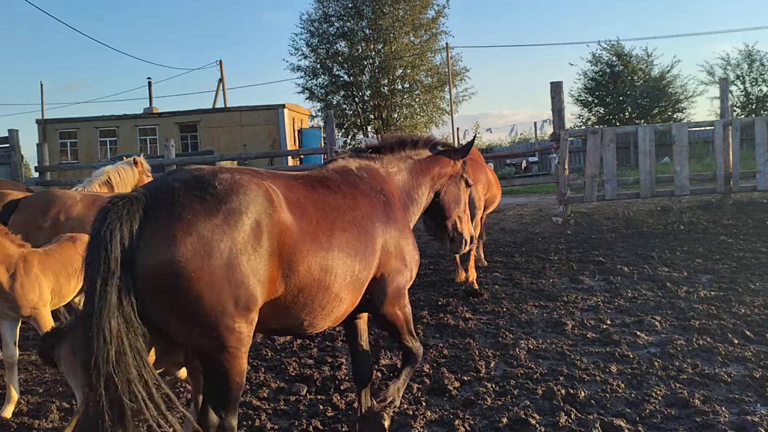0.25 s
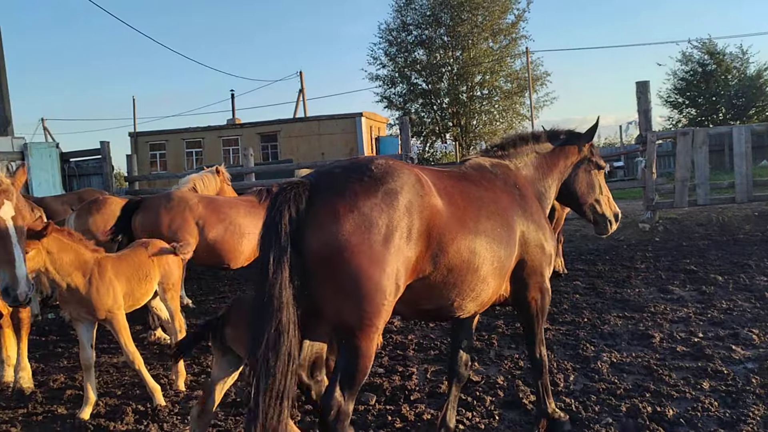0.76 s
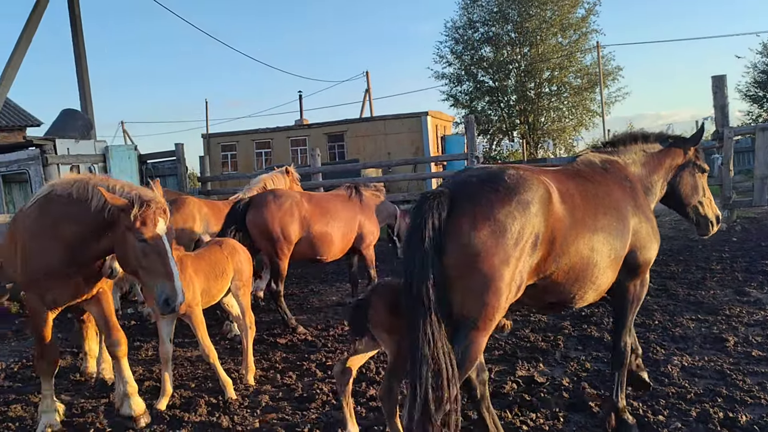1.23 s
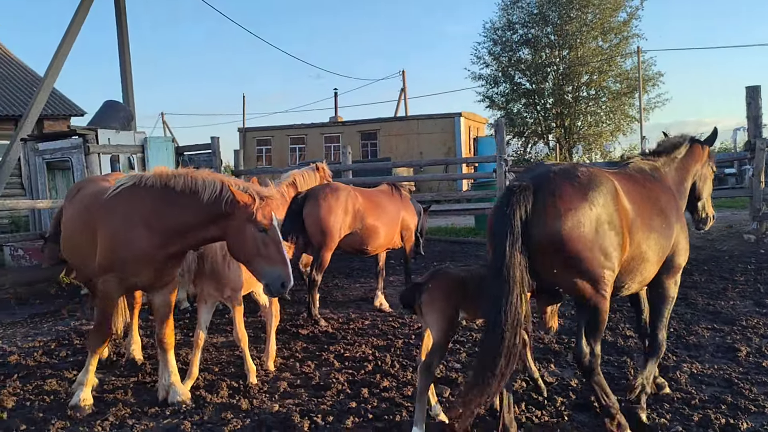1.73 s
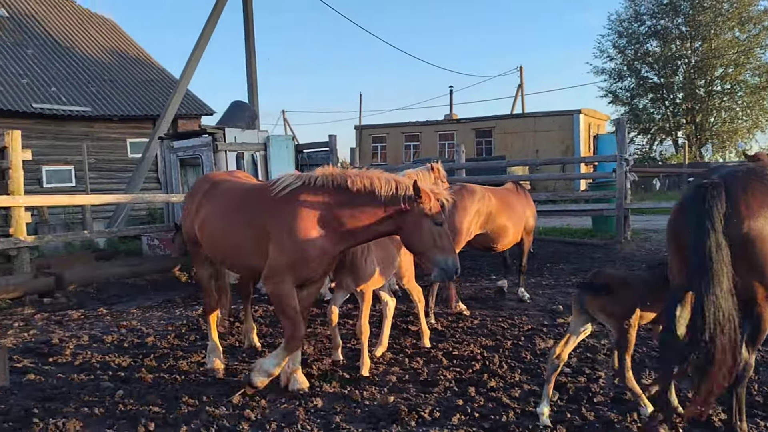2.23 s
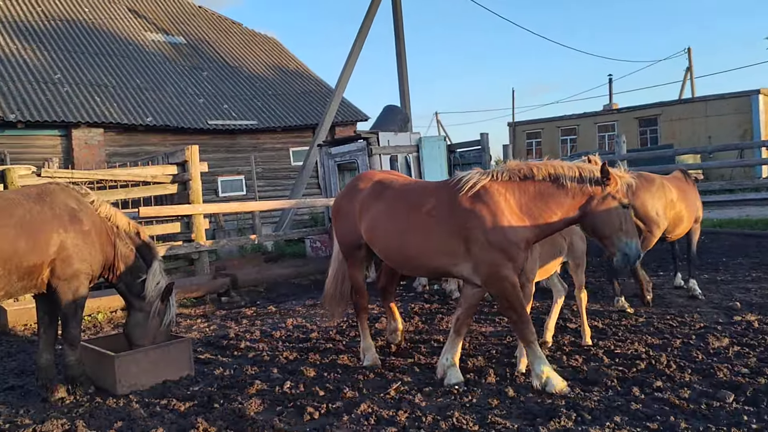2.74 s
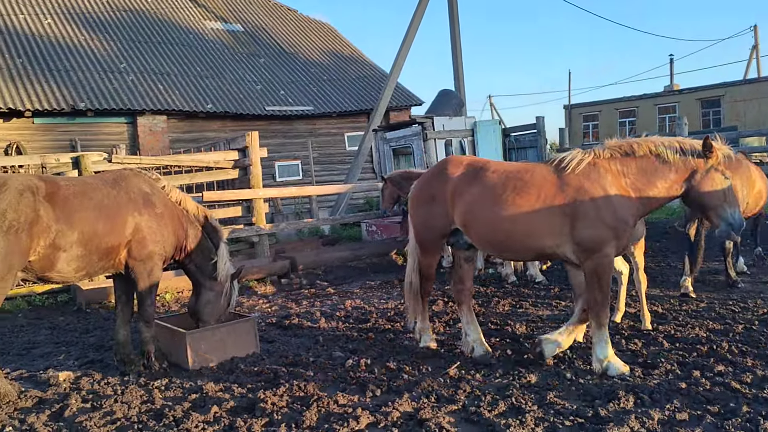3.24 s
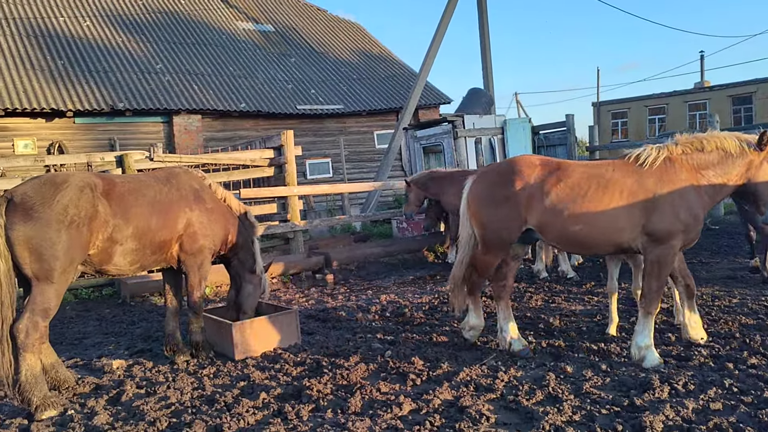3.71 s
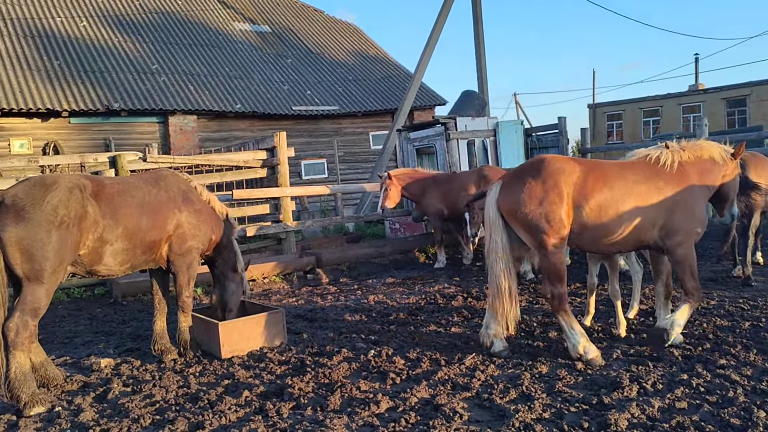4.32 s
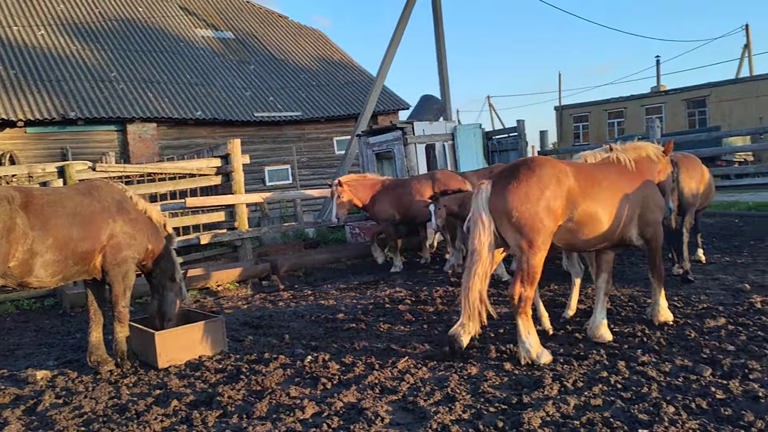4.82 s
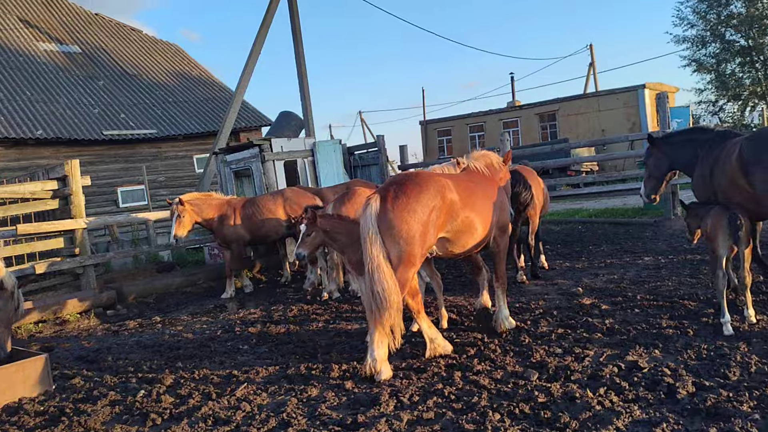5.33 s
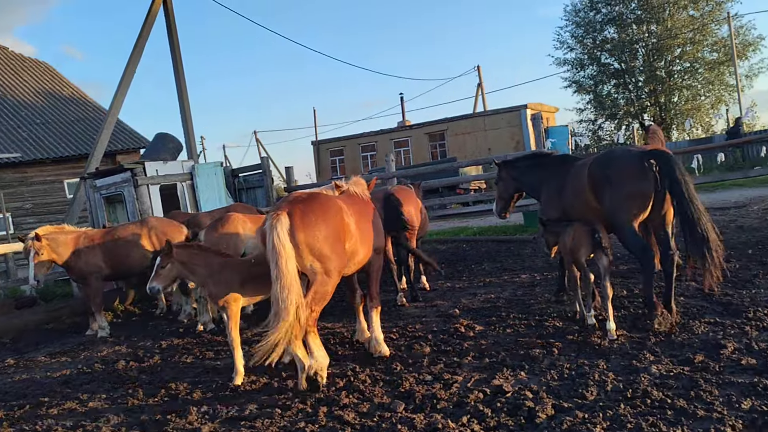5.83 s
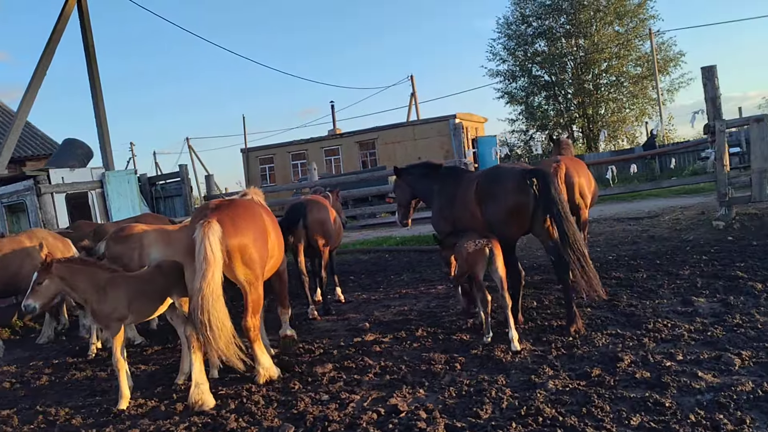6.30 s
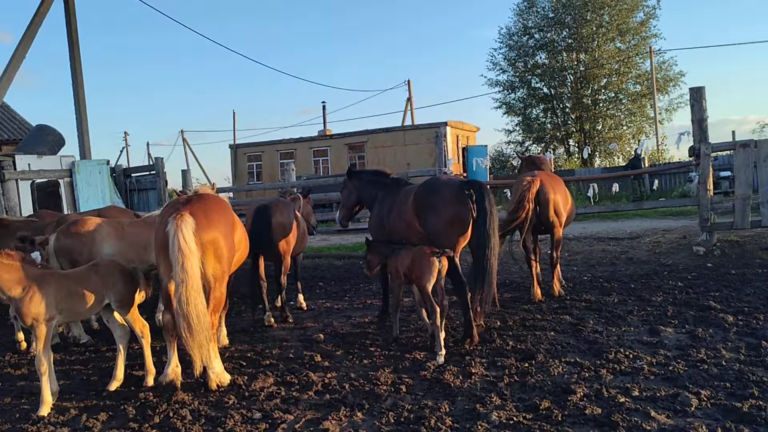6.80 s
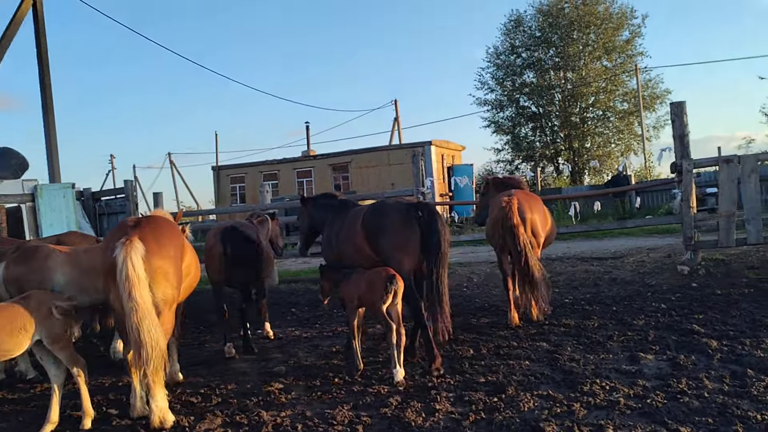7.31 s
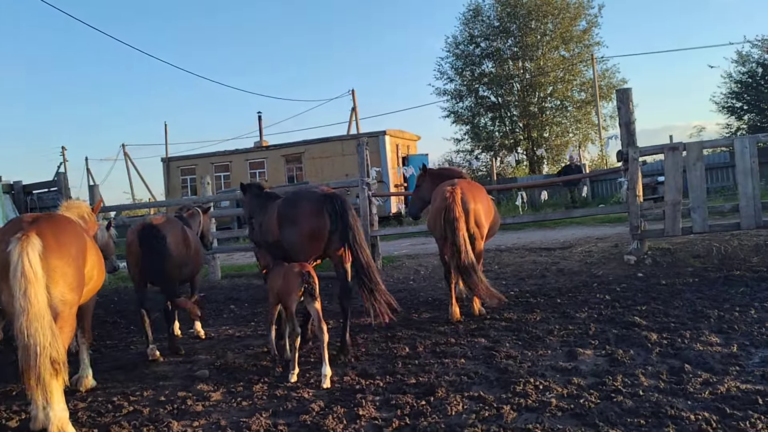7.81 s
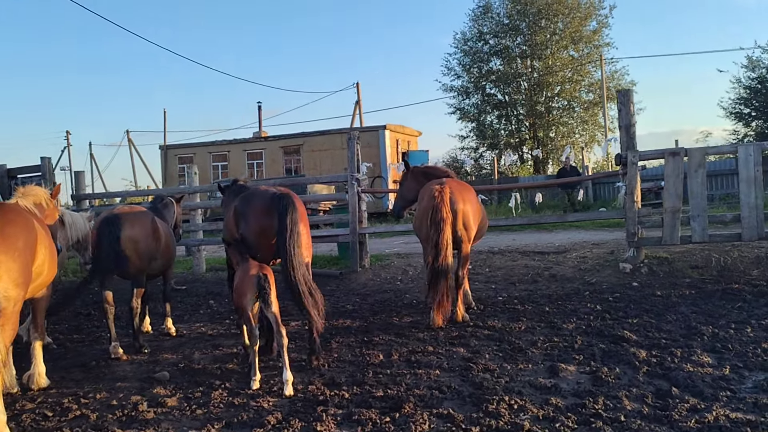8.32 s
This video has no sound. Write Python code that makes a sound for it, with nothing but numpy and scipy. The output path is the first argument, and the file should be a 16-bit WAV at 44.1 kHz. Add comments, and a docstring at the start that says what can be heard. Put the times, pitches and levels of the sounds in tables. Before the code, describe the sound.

Close, sticky mud crackles, slurps and snaps almost continuously as horses tread a paddock, with soft thuds, a faint breathy hiss and light wind.

```python
"""Horses walk through wet mud in an open paddock, close to a hand-held phone with one microphone.
From the start, yard noise and a wavering hum lie far off (shaped noise), with wind puffs on the microphone;
close by, mud sucks, fizzes and sprays (patchy noise and tiny bursting pockets), smacks as it lets go (snaps
and splatter), then gurgles (ringing noise) and chirps (gliding tones). From 1.8 s a breathy hiss (resonant
noise) comes and goes, from 2.4 s hooves thud (damped sines). A gate ducks the quiet moments."""
import sys
import numpy as np
from scipy import signal
from scipy.fft import rfft, irfft
from scipy.io import wavfile
from scipy.ndimage import uniform_filter1d, minimum_filter1d

SR = 44100
rng = np.random.default_rng(int(sys.argv[2]) if len(sys.argv) > 2 else 0)


def store_wav(level_fs):
    """Save 16-bit WAV to argv[1]."""
    pcm = np.round(np.clip(np.atleast_2d(level_fs), -1, 1) * 32767)
    wavfile.write(sys.argv[1], SR, pcm.T.astype(np.int16))


N = 377055  # length [samples]


def gain_of(db):
    """Decibels to amplitude."""
    return 10 ** (np.asarray(db) / 20)


def evened(x):
    """Scales to rms 1."""
    return x / np.sqrt(np.mean(x ** 2) + 1e-20)


def read(points, at):
    """Reads a spectrum in dB on a log-frequency axis."""
    hz, db = np.transpose(points)
    return np.interp(np.log(at + 1), np.log(hz + 1), db)


def add(mix, s, sound):
    """Mixes a sound in at time s."""
    part = mix[max(round(s * SR), 0):][:len(sound)]
    part += sound[:len(part)]


def coloured(x, spectrum):
    """Filters x by a spectrum and scales it to rms 1."""
    hz = np.fft.rfftfreq(len(x), 1 / SR)
    return evened(irfft(rfft(x) * gain_of(read(spectrum, hz)), len(x)))


def resonate(x, hz, width):
    """A resonance applied twice, for steep skirts: x is shifted down to 0 Hz, smoothed and shifted back."""
    turn = np.exp(2j * np.pi * hz * np.arange(len(x)) / SR)
    r = np.exp(-np.pi * width / SR)
    smooth = signal.lfilter([(1 - r) ** 2], [1, -2 * r, r * r], x / turn)
    return 2 * (turn * smooth).real


def patchy(spectrum, patchy_db, flicker_db, size):
    """Noise of a given spectrum with narrow drifting patches, wide ones, and a flicker shared by all pitches."""
    hop = size // 4
    frames, hz = N // hop + 5, np.fft.rfftfreq(size, 1 / SR)
    real, imaginary, narrow, wide = rng.standard_normal((frames, len(hz), 4)).T
    # axis 0 is frequency, axis 1 is time
    narrow = evened(uniform_filter1d(uniform_filter1d(narrow, size=2, axis=0), size=30, axis=1))
    wide = evened(uniform_filter1d(uniform_filter1d(wide, size=9, axis=0), size=20, axis=1))
    flicker = evened(uniform_filter1d(rng.standard_normal(frames), size=5))
    level_db = read(spectrum, hz)[:, None] + patchy_db * (narrow + 0.88 * wide) + flicker_db * flicker
    spectrogram = (real + 1j * imaginary) * gain_of(level_db)
    return evened(signal.istft(spectrogram, nperseg=size, noverlap=size - hop)[1][:N])


# colour of the distant yard: (frequency [Hz], relative level per Hz [dB])
YARD = [(18, -38), (30, -11), (43, -52.5), (107, 6.5), (314, -7), (978, -0.5), (1940, -12), (2740, -16.5),
        (4640, -21.5), (5590, -13), (9730, -17), (14800, -23.5), (16500, -35)]
YARD_DB = -61  # rms
# colour of the wind rumble: (frequency [Hz], relative level per Hz [dB])
PUFF = [(12, -41.5), (20, -20), (65, 3.5), (100, -5), (130, -43.5), (220, -120)]
# resonances of the distant hum: (frequency [Hz], width of one pass [Hz], relative level [dB])
HUM = [(95, 16, 0), (109, 13, 3), (165, 19, -3.5)]
# course of the lows: (time [s], wind rumble on the microphone [dB], distant hum [dB])
LOWS = [(0.0, -73, -63), (0.07, -84, -70), (0.26, -51.5, -52), (0.4, -58, -67), (0.45, -49.5, -52.5),
        (0.76, -79, -68), (4.64, -78, -68.5), (4.81, -80, -77), (4.86, -65, -46), (4.9, -70, -64),
        (5.69, -83, -61.5), (5.83, -87, -69), (5.86, -69, -55), (6.12, -89, -64), (6.43, -68, -65.5),
        (7.0, -79, -72.5), (7.48, -60, -65.5), (7.52, -87, -74), (7.67, -82, -66.5), (8.55, -70, -71)]


def background():
    """Distant yard noise, a hum that wavers as narrow-band noise does, and wind rumble on the microphone."""
    s, wind_db, hum_db = np.transpose(LOWS)
    t, x = np.arange(N) / SR, rng.standard_normal(N)
    hum = evened(sum(gain_of(db) * evened(resonate(x, hz, width)) for hz, width, db in HUM))
    wind = patchy(PUFF, 4.5, 2.1, size=2048)
    lows = gain_of(np.interp(t, s, wind_db)) * wind + gain_of(np.interp(t, s, hum_db)) * hum
    yard = gain_of(YARD_DB) * patchy(YARD, 2.3, 0.73, size=1024)
    return yard + lows


# stretches of trampling, the mud seething throughout; levels before the trims in churn():
# (start [s], end [s], fizz level [dB], then relative to it: suck, strongest near 2 kHz and again
#  near 6.5 kHz [dB], spray near 10 kHz [dB], mist above 12 kHz [dB])
TRAMPLING = [(0, 0.554, -54.5, 3.5, -3, -7), (0.557, 0.914, -64.5, 2, 6, -5),
             (1.022, 1.403, -54, -2, -3, -15), (1.461, 1.495, -66, 4, -8, -11),
             (1.527, 1.762, -61, 1, 0, -6), (1.733, 2.129, -63, 3.5, 1.5, -9),
             (2.173, 2.35, -66.5, -11, 2, -1), (2.364, 2.705, -53, -9, -11, -14),
             (2.726, 3.017, -54.5, 0.5, -8, -7), (3.052, 3.113, -68, 14.5, 4, -9),
             (3.24, 3.46, -71, 5.5, 3.5, -3), (3.469, 3.602, -61, 2, 2, -8),
             (3.596, 4.307, -53, -1.5, -11, -9), (4.489, 4.99, -56, 0, -5.5, -13),
             (4.981, 5.262, -56.5, 1, -11, -16), (5.275, 5.678, -54.5, -1, -4, -13),
             (5.683, 5.993, -61.5, 9.5, -7, -6), (5.997, 6.607, -52, -0.5, -10, -2.5),
             (6.596, 7.5, -57, 3.5, -10, -14.5), (7.793, 8.241, -56, 0, -9, -12),
             (8.271, 8.555, -60.5, 5.5, -8, -11)]
# a hoof pressing in or pulling out; levels before the same trims:
# (start [s], length [s], fizz level [dB], then relative to it: suck [dB], spray [dB], mist [dB])
SQUELCHES = [(0.0, 0.0083, -43, 10, -6, -10), (0.065, 0.014, -45.5, -1, -10, -4),
             (0.12, 0.125, -70, 6, -13, -8), (0.277, 0.025, -50.5, 4, -4, -18),
             (0.364, 0.087, -46, -0.5, 0.5, -2), (0.602, 0.024, -64, 15, 13, -4),
             (0.621, 0.05, -57.5, 2, 11, -11), (0.686, 0.042, -54.5, -13, 8, -1),
             (0.741, 0.041, -54.5, -9, 4.5, 2), (0.796, 0.036, -64.5, 6, 17.5, -7),
             (0.861, 0.028, -53.5, 1, -2, -14), (1.025, 0.013, -52.5, 5, 0, -19),
             (1.078, 0.064, -47, 2, -2, -19), (1.252, 0.016, -53, -12, 8, -11),
             (1.297, 0.055, -60.5, -13, 9, -14), (1.454, 0.057, -60.5, 0.5, -14, -14),
             (1.579, 0.022, -74, 19, -8, -12), (1.659, 0.028, -49, -2.5, 5.5, -18),
             (1.791, 0.02, -55, 1.5, -1, 5), (1.899, 0.025, -49, -0.5, 3, -4),
             (1.989, 0.041, -53, -9, -0.5, 4), (2.045, 0.058, -53.5, -12.5, -6, -21),
             (2.178, 0.043, -71, -9, -6, 3), (2.254, 0.017, -53.5, -4, 4, -26),
             (2.391, 0.008, -40.5, 2, -5, -3), (2.459, 0.02, -56, 0, 1, -5),
             (2.519, 0.045, -50.5, 1.5, -8, -2.5), (2.589, 0.018, -50.5, 0, 1, -2),
             (2.656, 0.038, -57.5, -13, -4, -12), (2.759, 0.08, -49, -15, 8.5, -3),
             (2.891, 0.057, -58, -12, 13, 3), (3.058, 0.034, -69, 10, 10.5, -10),
             (3.27, 0.022, -77, -1, -4, -10), (3.302, 0.033, -67, 7, -1, -1),
             (3.367, 0.055, -52, -2.5, -3.5, -12), (3.5, 0.045, -51, 1, -10, -12),
             (3.634, 0.13, -50.5, -26, 1, 0), (3.973, 0.064, -42.5, -4.5, -11, -3),
             (4.138, 0.055, -60.5, 14.5, -11, -13), (4.245, 0.031, -58, 10.5, -11, -18),
             (4.417, 0.017, -65.5, 1, -6, -12), (4.512, 0.015, -44.5, -17, -13, -13),
             (4.654, 0.13, -57.5, 4.5, -0.5, -4), (4.784, 0.032, -45.5, -2, 5.5, 1),
             (4.864, 0.09, -58.5, -2, 1, -3), (5.021, 0.03, -55.5, -15, 4.5, 2),
             (5.123, 0.021, -41.5, -1, -13, -17), (5.273, 0.077, -56.5, -9, -8, -5),
             (5.434, 0.076, -47, -12, 0, -3), (5.52, 0.031, -60.5, 2, 4, -4), (5.577, 0.057, -63, 1, 1, 14),
             (5.685, 0.018, -61, 12.5, -2, 1), (5.774, 0.13, -49, -0.5, -9, -12),
             (5.893, 0.017, -47, 2.5, -4, -8), (6.011, 0.1, -55.5, 3.5, -8, -2),
             (6.201, 0.037, -39, -8, -6, -7), (6.253, 0.029, -49, -16, -6, -8),
             (6.296, 0.031, -47, -12, -14, -7), (6.489, 0.039, -46.5, 2.5, -5, -11),
             (6.675, 0.027, -42.5, -3, -6.5, -18), (6.834, 0.043, -66, 1, -17, -19),
             (6.912, 0.057, -54.5, -1, -19, -20), (6.994, 0.024, -41, -2, -6.5, -23),
             (7.129, 0.04, -41.5, -7.5, -4, -5), (7.254, 0.11, -54, -9, -8, -13),
             (7.333, 0.029, -53, -5, -9, -15), (7.411, 0.018, -43.5, -8, -7, -23),
             (7.643, 0.029, -72, -1, 1, -1), (7.678, 0.055, -71, 6.5, 0, -6),
             (7.806, 0.032, -44, -2.5, -3, -6), (7.867, 0.064, -51, 1, -9, -2),
             (7.964, 0.029, -53, -11, 0, 2), (8.032, 0.042, -52.5, -12, -5, -6),
             (8.118, 0.044, -44.5, 0, -9, -20), (8.271, 0.023, -50.5, -7, -13, -17),
             (8.326, 0.016, -55.5, 0, 5, -1), (8.416, 0.036, -66, 5, -4, -13),
             (8.495, 0.067, -48, 1, 4.5, 5)]
RISE_DB_PER_S, SAG_DB, RELEASE_DB_PER_S = 901.5, -1.5, 347.5  # swell, slope over its length, dying away
CALM_S, CALM_DB = 0.11, -4  # the seething sinks over the last moments of each stretch
SETTLED_DB = -81.5  # the mud at rest between stretches, before the trims


def activity():
    """Level of fizz, suck, spray and mist: powers of the seething mud and of one swell per squelch add up."""
    t, power = np.arange(0, N + 64, 64) / SR, 0
    for start, end, fizz_db, *others_db in TRAMPLING:
        levels_db = fizz_db + np.c_[[0, *others_db]]
        calm_db = CALM_DB * np.clip(1 - (end - t) / CALM_S, 0, 1)
        power = power + gain_of(levels_db + calm_db) ** 2 * ((t >= start) & (t <= end))
    for start, length, fizz_db, *others_db in SQUELCHES:
        levels_db = fizz_db + np.c_[[0, *others_db]]
        rise_db = RISE_DB_PER_S * np.minimum(t - start, 0)
        sag_db = SAG_DB * (np.clip((t - start) / length, 0, 1) - .5)
        release_db = -RELEASE_DB_PER_S * np.maximum(t - start - length, 0)
        # no swell before its stretch of trampling begins
        began = max(row[0] for row in TRAMPLING if row[0] <= start + .01)
        power = power + gain_of(levels_db + rise_db + sag_db + release_db) ** 2 * (t >= began)
    level = np.sqrt(uniform_filter1d(power, size=4) + gain_of(SETTLED_DB) ** 2)
    return [np.interp(np.arange(N) / SR, t, row) for row in level]


def pops(lo_hz, hi_hz, per_s, spread_db, cycles):
    """Tiny air pockets bursting: short dying wavelets of many pitches, a few of them large."""
    draw, size, kind = rng.random(N), rng.exponential(1, N), rng.integers(0, 24, N)
    snaps = gain_of(spread_db * np.minimum(size, 5)) * (draw < per_s / SR)
    out = np.zeros(N)
    for k, hz in enumerate(np.geomspace(lo_hz, hi_hz, 24)):
        u = np.arange(0, 4 * cycles, hz / SR) / cycles
        wavelet = u ** .5 * np.exp(-2.5 * u) * np.sin(2 * np.pi * cycles * u)
        out += signal.oaconvolve(snaps * (kind == k), wavelet)[:N]
    return out


# colours of the mud close to the microphone, each: (frequency [Hz], relative level per Hz [dB])
SUCK = [(290, -49.5), (500, -21), (935, -5), (1120, -5), (1360, -5), (1490, -3), (1910, 4.5), (5000, -15.5),
        (6500, 1.5), (11000, -120)]
FIZZ = [(1470, -4), (2500, -23), (3000, 0), (4050, 8), (5040, 10.5), (6350, 17.5), (8390, 13.5),
        (9000, -56.5), (11700, -87.5), (19800, -120)]
SPRAY = [(4410, -44.5), (7500, 1.5), (9570, 13.5), (11600, 0.5), (12000, -7), (15600, -34), (22000, -120)]
MIST = [(6760, -36.5), (11500, -2), (13000, 5.5), (15300, -1), (15800, -12), (16200, -30.5), (16500, -31)]
PATCHES_DB = 3.3  # depth of the drifting patches in suck, fizz and spray


def churn():
    """Sucking, fizzing and spraying follow the hooves; hiss, with bursting pockets in all but the mist."""
    suck = patchy(SUCK, PATCHES_DB, 2.6, size=384) + gain_of(-9.0) * evened(pops(1227, 3400, 300, 5.1, 9.8))
    fizz = patchy(FIZZ, PATCHES_DB, 3.9, size=384) + gain_of(-7.5) * evened(pops(2400, 8000, 600, 2.6, 26.0))
    spray = patchy(SPRAY, PATCHES_DB, 3.3, size=384) + gain_of(-3) * evened(pops(7800, 11500, 480, 10.0, 7.9))
    mist = patchy(MIST, 2.5, 3.3, size=384)
    layers = [(fizz, -2.5), (suck, -4), (spray, -3), (mist, -3)]  # with trims in dB
    return sum(x * gain_of(trim_db) * level for (x, trim_db), level in zip(layers, activity()))


# mud letting go; peaks before the bass cut, the four colours before the offsets in smacks():
# (time [s], peak level [dB], ringing pocket [Hz], wet body [dB], middle [dB], spray [dB], mist [dB],
#  splatter relative to the snap's noise [dB])
SMACKS = [(0.0675, -18, 7400, -24, -12, -16, -34, -10), (0.1338, -30, 1670, -6, -8, -8, -20, 1),
          (0.2684, -35, 2000, -6, -21, -32, -37, -2), (0.2907, -27.5, 5600, -7, -27, -13, -27, -3),
          (0.3326, -32, 2030, -13, -25, -1, -20, 1), (0.3734, -20, 5550, -29, -24, -14, -37, -14),
          (0.49, -25.5, 6240, -22, -21, -29, -35, -2), (0.5816, -31, 1830, -15, -38, -4, -22, 9),
          (0.63, -34, 9540, -11, -32, -6, -23, -5), (0.6537, -24.5, 10000, -33, -34, -15, -35, -10),
          (0.7034, -29.5, 9000, -18, -20, -13, -27, -5), (1.0233, -34, 7310, -23, -17, -8, -32, -7),
          (1.0837, -21.5, 2080, -12, -14.5, -11, -44, 8), (1.1084, -30, 2240, -18, -8, -23, -39, 2),
          (1.1484, -29, 2220, -4, -10, -9, -39, -6), (1.1932, -33, 3320, -4, -11, -25, -27, -4),
          (1.2366, -34, 9340, -25, -28, -4, -29, -2), (1.2626, -27.5, 9400, -14.5, -28, -20, -47, -6),
          (1.3047, -30, 10500, -28, -34, 3, -22, -12), (1.3217, -22.5, 9260, -42, -46, -6, -29, -4),
          (1.342, -33, 9400, -28, -29, -9, -35, -9), (1.4563, -38, 5600, -21, -26, -44, -40, 0),
          (1.525, -40, 5570, -13, -29, -17, -30, -9), (1.6679, -19, 8900, -41, -28, -25, -59, -7),
          (1.7933, -39, 2040, -19, -7, -15, -20, -1), (1.9, -30, 10400, -7, -27, -11, -22, -14),
          (1.9091, -25.5, 9000, -29, -21, -21, -29, -23), (2.1786, -38, 4600, -34, -21, -15, -30, -3),
          (2.2525, -24, 8360, -32, -29, -1, -57, 0), (2.387, -16, 9750, -25, -26, -6, -7, -5),
          (2.3895, -9, 2030, -7, -21, -16, -16, -9), (2.3933, -13, 9720, -10, -10, -14, -22, -1),
          (2.3979, -11, 3610, -18, -16, -27, -22, -16), (2.4014, -28, 9910, -14, -8, -12, -18, -17),
          (2.4128, -22, 1390, -12, -20, -17, -20, -9), (2.5182, -29, 6700, 0, -13, -17, -18, 4),
          (2.5421, -22.5, 3100, -41, -24, -21, -31, -17), (2.575, -27.5, 3020, -22, -2, -27, -27, -9),
          (2.585, -27, 6100, -23, -5, -27, -20, -6), (2.5997, -21.5, 9600, -27, -22, -28, -25, -2),
          (2.7516, -21, 9200, -14, -18, 0, -33, -18), (2.7624, -26, 8730, -17, 2, -18, -23, -10.5),
          (2.814, -20.5, 8730, -33, -15, -13, -27, -6), (2.9122, -29, 9400, -20, -8, -4, -19, -7),
          (2.9338, -27, 9600, -22, -2, -7, -29, -24), (3.064, -43.5, 3030, 0, -22.5, -13, -30, -8),
          (3.243, -43, 1290, -18, -24.5, -17, -26, -10.5), (3.257, -49, 1510, -13, -21, -16, -21, -11),
          (3.2785, -43, 5610, -2, -19, -15, -29, -2), (3.3088, -38, 9810, -22, -15, -10, -30, 5),
          (3.3617, -31, 8800, -26, -26, -3, -33, -4), (3.475, -28.5, 2330, 8.5, 1.5, -30, -40, -12.5),
          (3.757, -27.5, 3620, -20, -2, -30, -23, -21), (3.8844, -31.5, 3930, -10, -4, -12, -16, 7),
          (3.9699, -23.5, 7050, -24, -15, -12.5, -25, -13), (4.0084, -20.5, 5640, -23, -15, -14, -39, -4.5),
          (4.1616, -20.5, 2080, -23, -18, -20, -26, -9), (4.253, -28, 6440, -17, -27, -32, -48, -8),
          (4.3301, -43, 2354, -12, -17, -23, -31, -9), (4.4014, -42.5, 2280, -23, -19, -17, -28, -18),
          (4.421, -43, 7160, -14, -17, -22, -25, -8), (4.453, -44, 9660, -14, -15, -22, -23, 3),
          (4.4972, -39.5, 6760, -30, -31, -10, -2, -9), (4.5122, -18, 9900, -26, -26, -7, -3, -7),
          (4.5204, -21.5, 6970, -37, -16, -21, -9, 0), (4.7247, -31, 3130, -10, -2, -13, -21, -2),
          (4.772, -28, 6540, -15, -4, -16, -20, -4), (4.7983, -19.5, 9800, -22, -17, -11, -23, -3),
          (4.9472, -33, 6370, -17, -11, -25, -22, -12), (5.0247, -29.5, 9700, -26, -29, -16, -25, -9),
          (5.1318, -22.5, 6500, -15, -26, -13, -50, -8), (5.2742, -25.5, 2900, -29, -30, -10, -29, 0),
          (5.303, -36, 9840, -20, -28, -9, -16, -9), (5.4161, -29.5, 3400, -20, -20, -13, -17, -8),
          (5.4434, -32, 2280, -25, -23, -9, -10, -9), (5.463, -27.5, 2940, -18, -18, -9, -13, -4),
          (5.5417, -26, 8700, -39.5, -22, -4, -22, -19), (5.6265, -20.5, 6130, -22, -13, -6, -14, -13),
          (5.7833, -31.5, 6500, -22, -8, -29, -39, -7), (5.8052, -32, 2900, -5, -2, -25, -32, -1),
          (5.898, -28.5, 1870, -17, -17, -26, -25, -7), (6.2026, -24, 7010, -34, -18, -25, -30, -12),
          (6.2143, -27.5, 2100, -23, -11, -17, -24, -9), (6.315, -30, 2030, -21, -12, -20, -29, 8),
          (6.4015, -31.5, 2940, -16, -19, -23, -33, -14), (6.4773, -26.5, 7100, -20, -13, -20, -29, -18),
          (6.5191, -17.5, 9070, -32, -40, 2, -28, -21), (6.6807, -21.5, 5630, -29, -33, -27, -43, 4),
          (6.764, -34, 6900, -34, -16, -22, -42, -11), (6.9336, -33, 2240, -10, -24, -34, -41, -3),
          (7.017, -19.5, 5000, -34, -25, -21, -45, -5), (7.1062, -27, 7150, -7, -30, -9, -18, -1),
          (7.1285, -30, 7180, 2, -20, -11, -17, -7), (7.1646, -20.5, 8160, -43, -34, -17, -30, -11),
          (7.1913, -29, 8650, -24, -27, -6, -23, -16), (7.206, -23, 10800, -10, -36, -9, -32, -9.5),
          (7.3154, -27, 11350, -30, -11, -14, -18, -17), (7.4132, -20, 1430, -15.5, -32, -36, -47, -5),
          (7.5373, -44, 1950, -15, -21, -17, -31, 1), (7.608, -41.5, 1410, -8, -28, -22, -32, -10.5),
          (7.648, -46, 1860, -9.5, -26, -21, -21, -4), (7.6605, -43, 1540, -16, -29, -18, -29, -13),
          (7.6839, -44, 1200, -9, -15, -14, -27, -9.5), (7.7057, -42, 1390, 0, -19, -13.5, -27, -12),
          (7.7894, -37, 6700, -14, -25, -12, -19, -10), (7.8112, -21.5, 2210, -12, -33, -15, -17, -5),
          (7.8294, -27, 7240, -19, -3, -21, -31, -1), (7.874, -22.5, 10400, -23, -23, -27, -39, -3),
          (7.9823, -29.5, 11900, -35, -4, -10, -14, -6), (8.0407, -28.5, 4500, -32, -23, -9, -12, -1),
          (8.1299, -35, 2300, -26, -10, -16, -31, -1), (8.2028, -35.5, 10000, -22, -25, -7, -29, -16),
          (8.2748, -34, 1390, -15, -37, -42, -44, -6), (8.3325, -17, 7720, -38, -25, -10, -23, -10.5),
          (8.4471, -33, 1460, -2, -45, -33, -38, -9), (8.4916, -22.5, 9700, -29, -11, -6, -16, -6.5)]
SNAP_T60_S, SPLATTER_T60_S = 0.006, 0.041


def smacks():
    """A snap, then a lumpy splatter that dies away; a pocket in the mud rings along."""
    out, t = np.zeros(N), np.arange(4096) / SR
    noise = rng.standard_normal((len(SMACKS), 2, 4096))
    for smack, (x, lumps) in zip(SMACKS, noise):
        s, peak_db, hz, body_db, middle_db, spray_db, mist_db, splatter_db = smack
        colour = [(350, body_db - 8), (1200, body_db - 8), (2400, body_db + 2.0),
                  (3200, middle_db + 6.0), (4900, middle_db - 1.0), (6800, -12.0),
                  (9500, spray_db + 4.5), (14500, mist_db + 11.5), (17000, mist_db - 28)]
        wet = coloured(x, colour) + gain_of(-5) * evened(resonate(x, hz, 0.2 * hz))
        lumps_db = 6.57 * evened(uniform_filter1d(lumps, size=60))
        splatter = wet * gain_of(splatter_db - 60 * t / SPLATTER_T60_S + lumps_db)
        ring = 1.73 * np.sin(2 * np.pi * hz * t)
        snap = (wet + ring) * gain_of(-60 * t / SNAP_T60_S) * np.minimum(t / 0.00015, 1)
        burst = snap + splatter * np.minimum(t / 0.0017, 1)
        add(out, s, gain_of(peak_db) * burst / abs(burst).max())
    return signal.lfilter(*signal.butter(3, 300, "high", fs=SR), out)  # small patches of mud radiate no bass


# air drawn through a wet pocket under a hoof:
# (time [s], length [s], pocket [Hz], width of one pass [Hz], rms level before fading [dB])
GURGLES = [(0.127, 0.05, 1930, 370, -50), (0.357, 0.2, 1770, 277.8, -58), (0.631, 0.15, 1930, 400, -58.5),
           (1.086, 0.075, 2070, 260, -47.5), (1.101, 0.066, 262, 90, -57),
           (1.552, 0.12, 1468, 98.15, -41.5), (1.58, 0.063, 1780, 324, -45),
           (1.592, .036, 1980, 324.1, -41.5), (1.788, 0.04, 1950, 370.4, -49.5),
           (2.415, 0.056, 1200, 278, -53.5), (2.521, 0.071, 3030, 700, -49),
           (2.741, 0.07, 2460, 555.6, -49), (2.816, 0.038, 3070, 972, -49.5),
           (2.878, 0.068, 2870, 972, -54.5), (3.401, 0.081, 250, 201, -61), (3.85, 0.24, 307.5, 200, -71),
           (3.91, 0.036, 2110, 250, -48), (3.917, 0.023, 1650, 140, -54), (4.13, 0.17, 1650, 410, -53.5),
           (4.617, 0.095, 2030, 610, -53.5), (4.947, 0.46, 1130, 352, -61), (5.432, 0.11, 2200, 400, -55),
           (5.698, 0.043, 1890, 700, -53), (5.776, 0.25, 1710, 540, -52), (5.945, 0.048, 1620, 324, -50.5),
           (5.956, 0.45, 1160, 300, -63), (6.361, 0.074, 3090, 580, -47), (6.485, 0.044, 2480, 1200, -60),
           (6.712, 0.055, 1420, 270, -50), (6.895, .061, 1090, 270, -54),
           (6.973, 0.081, 1344, 185.2, -51.5), (6.998, 0.32, 750, 298, -60.5),
           (7.403, 0.057, 1570, 500, -43.5), (7.835, .11, 3430, 700, -48), (8.092, 0.084, 1900, 350, -67),
           (8.097, 0.24, 1241, 437.4, -57.5), (8.269, 0.073, 1330, 350, -52.5),
           (8.289, 0.084, 1870, 400, -53), (8.414, 0.08, 1400, 400, -49), (8.425, 0.052, 2120, 500, -59)]


def gurgles():
    """Lumpy noise rings in one pocket, swelling and fading."""
    out = np.zeros(N)
    noise = rng.standard_normal((len(GURGLES), 2, SR // 2))
    for (s, length, hz, width, db), (x, lumps) in zip(GURGLES, noise):
        n = round(length * SR)
        lumpy = x * gain_of(2.97 * evened(uniform_filter1d(lumps, size=150)))
        ringing = evened(resonate(lumpy, hz, width)[-n:])
        add(out, s, gain_of(db) * ringing * signal.windows.tukey(n, .6))
    return out


# single air pockets bursting: (time [s], peak level [dB], start pitch [Hz], end pitch [Hz], length [s])
BUBBLES = [(0.334, -45.5, 820, 656, 0.018), (0.601, -30.5, 1460, 2610, .02),
           (1.066, -45.5, 1200, 1330, 0.016), (4.559, -51, 1750, 1780, 0.026),
           (4.562, -49, 410, 456, 0.022), (4.563, -52, 2260, 2330, 0.018), (4.714, -48.5, 2590, 4220, .016),
           (4.887, -41, 1260, 1960, 0.022), (5.178, -42, 2920, 3000, 0.011),
           (5.273, -38, 2650, 3220, 0.0055), (5.412, -44, 3420, 3700, 0.0092),
           (5.555, -46.5, 970, 1200, 0.0089), (5.704, -43.5, 1360, 1750, 0.012),
           (7.293, -36, 2350, 3020, 0.0086), (7.816, -44, 2040, 2300, 0.013),
           (8.107, -44, 1190, 1290, 0.013), (8.543, -34, 470, 506, 0.0034)]


def bubbles():
    """A pocket's pitch glides as it opens to the air."""
    out = np.zeros(N)
    for s, peak_db, start_hz, end_hz, length in BUBBLES:
        u = np.linspace(0, 1, round(length * SR))
        turns = np.cumsum(start_hz + (end_hz - start_hz) * u) / SR
        swell = np.sin(np.pi * u ** 0.66) ** 1.56
        add(out, s, gain_of(peak_db) * swell * np.sin(2 * np.pi * turns))
    return out


# a breathy band of hiss, perhaps a horse drawing air: (time [s], length [s], rms level before fading [dB])
SIGHS = [(1.787, 0.47, -60.5), (2.175, .165, -58.5), (3.955, 0.37, -61), (6.801, .5, -54)]
# its resonances: (frequency [Hz], width of one pass [Hz], relative level [dB])
SIGH = [(3600, 610, -2.5), (4130, 570, -3), (4830, 710, -5)]


def sighs():
    """Smooth noise in a few neighbouring resonances, swelling and fading."""
    out = np.zeros(N)
    for (s, length, db), x in zip(SIGHS, rng.standard_normal((len(SIGHS), SR))):
        n = round(length * SR)
        air = sum(gain_of(peak_db) * resonate(resonate(x, hz, width), hz, width) for hz, width, peak_db in SIGH)
        add(out, s, gain_of(db) * evened(air[-n:]) * signal.windows.tukey(n, .4))
    return out


# hooves thudding into the soft ground: (time [s], level before decay [dB], pitch [Hz], t60 [s])
THUDS = [(2.389, -58, 304, 0.091), (2.993, -51.5, 370, 0.087), (3.867, -52, 366.7, 0.069),
         (3.921, -49.5, 360, 0.099), (3.959, -46, 353, 0.061), (4.018, -40.5, 420, 0.024),
         (4.041, -52, 237, 0.13), (4.075, -51.5, 254, .08), (4.505, -51, 454, 0.045),
         (4.849, -47, 95, 0.18), (5.865, -39.5, 152, 0.059), (7.407, -49, 348, 0.12),
         (7.705, -46, 204, 0.072), (7.802, -51, 336, 0.052), (8.537, -44, 298, 0.095)]


def thuds():
    """A short damped low swing."""
    out, t = np.zeros(N), np.arange(8192) / SR
    for s, level_db, hz, t60 in THUDS:
        decay = gain_of(level_db - 60 * t / t60) * np.minimum(t / 0.00067, 1)
        add(out, s, decay * np.sin(2 * np.pi * hz * t))
    return out


def scene():
    """Distant yard and close mud reach one microphone."""
    return (background() + churn() + smacks() + gurgles() + bubbles() + sighs() + thuds())[None]


GATE_DB, KNEE_DB = -59.5, 2.5  # the gate starts to shut below this treble level, and shuts over this range
EDGE_HZ = 16550  # upper band limit


def record(dry):
    """A gate lowers the level while the treble is quiet, the treble most; then the band limit."""
    bass = signal.filtfilt(*signal.butter(1, 2200, fs=SR), dry)
    treble = dry - bass
    power_db = 10 * np.log10(abs(uniform_filter1d(treble ** 2, size=700)) + 1e-12)
    quiet = np.clip((GATE_DB - power_db) / KNEE_DB, 0, 1)
    held = minimum_filter1d(quiet, size=481, origin=240)  # waits 11 ms before shutting, not before opening
    shut = uniform_filter1d(held, size=260)  # eases both over 6 ms
    gated = bass * gain_of(-7 * shut) + treble * gain_of(-11 * shut)
    band_limit = signal.firwin(511, EDGE_HZ, window=("kaiser", 9), fs=SR)
    return signal.oaconvolve(gated, band_limit[None], "same")


dry = scene()
out = record(dry)
store_wav(out)
```